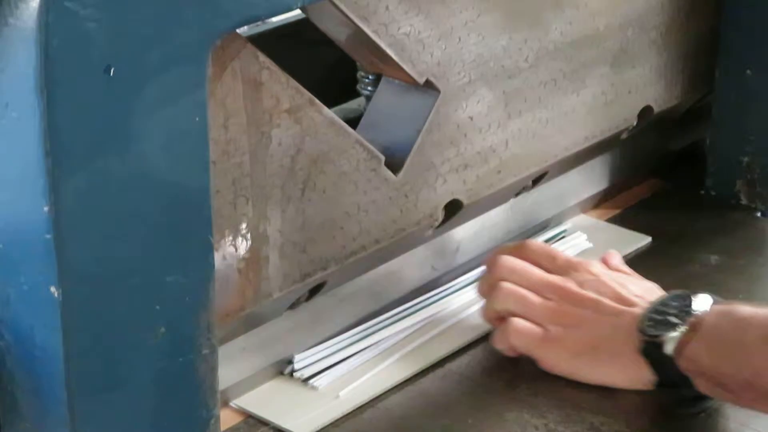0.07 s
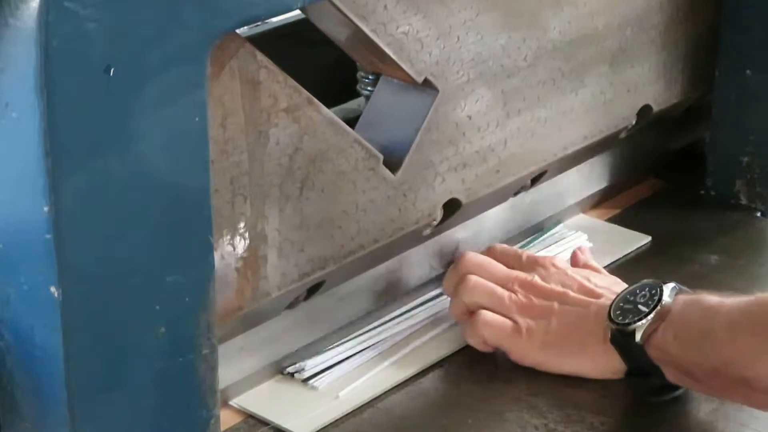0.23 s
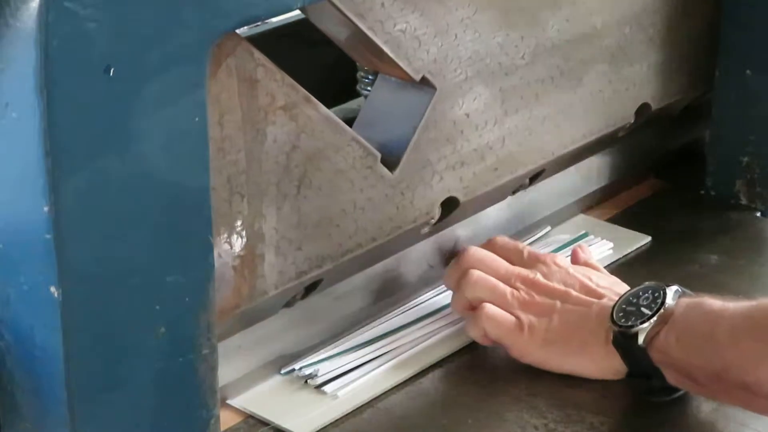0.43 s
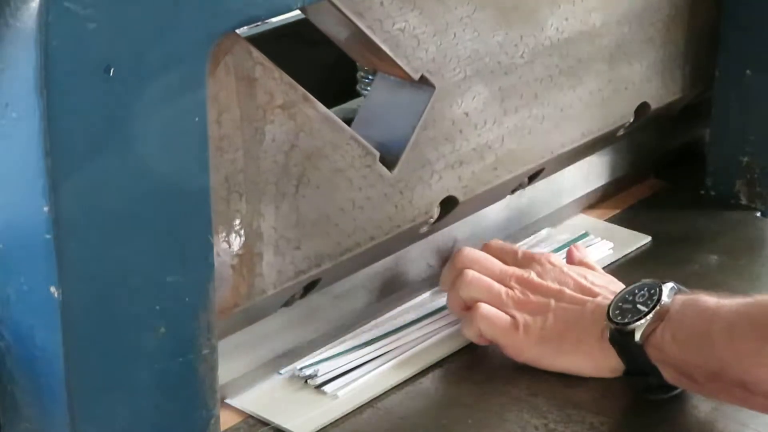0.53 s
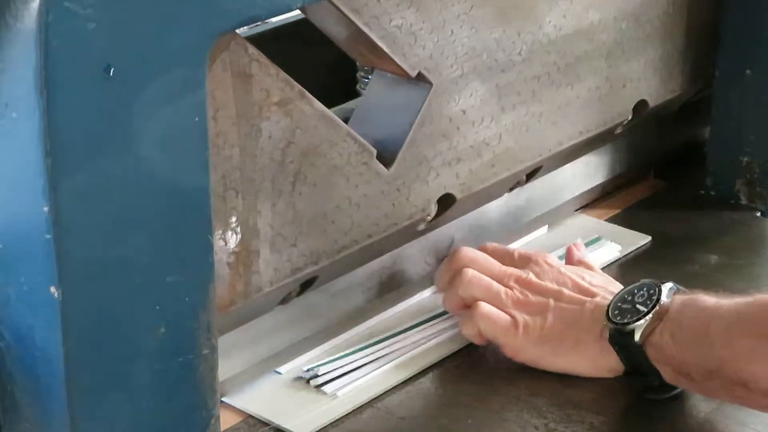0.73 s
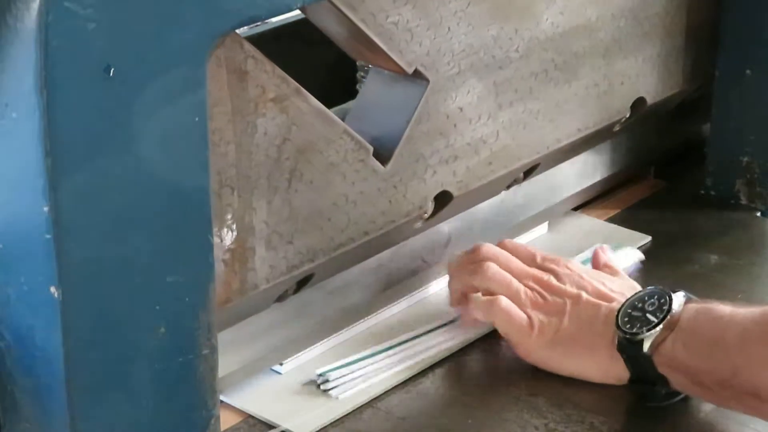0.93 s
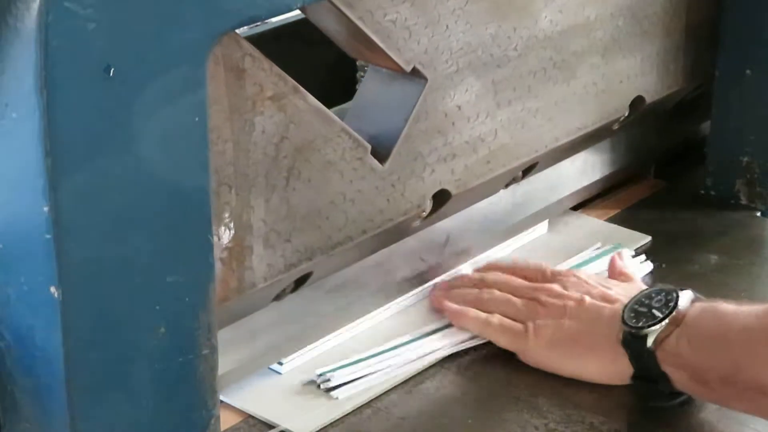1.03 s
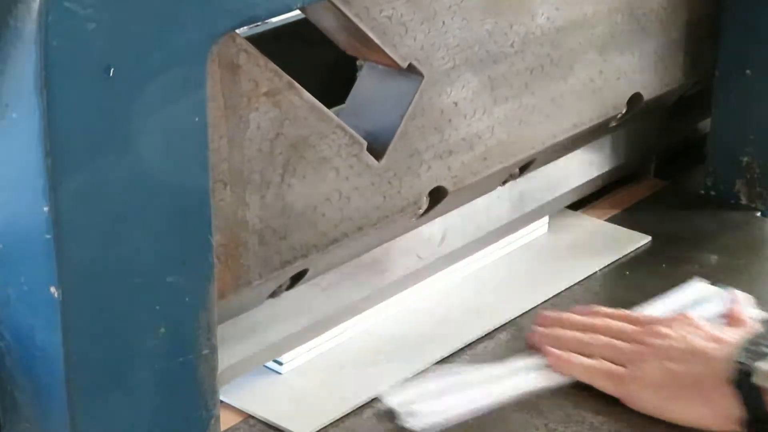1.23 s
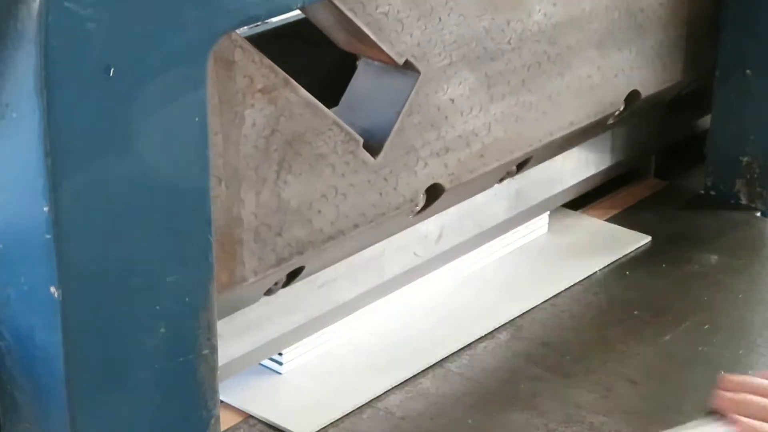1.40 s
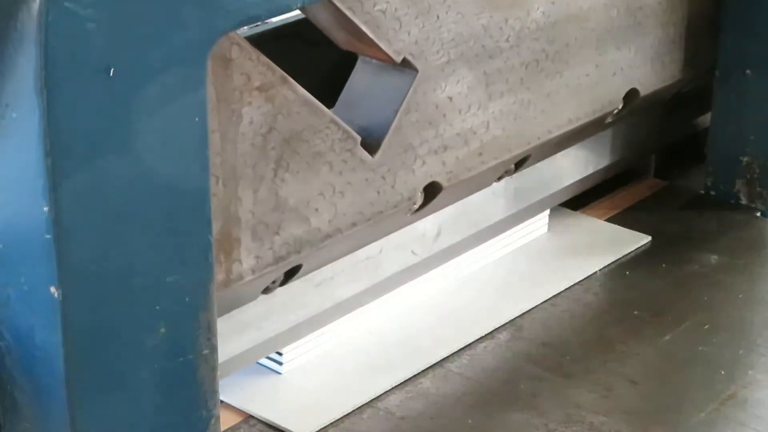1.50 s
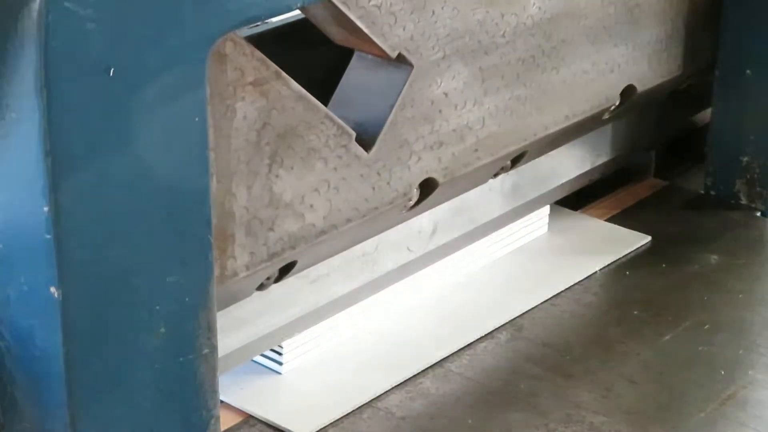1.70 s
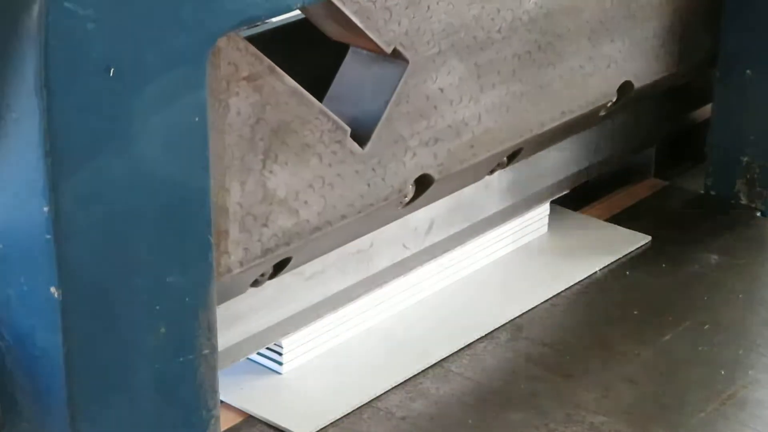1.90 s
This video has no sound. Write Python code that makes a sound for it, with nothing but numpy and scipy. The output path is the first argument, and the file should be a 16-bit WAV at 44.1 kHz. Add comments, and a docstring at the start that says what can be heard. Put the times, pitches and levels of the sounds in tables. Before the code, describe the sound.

One loud, ringing clunk comes from a paper guillotine close by, followed by irregular machinery knocks over a low workshop hum. A hand gathers paper strips with soft bumps and slides them off the steel table with a swish.

```python
"""A print workshop, where a paper guillotine idles. Its drive hums under dull knocks of machinery.
The steel mechanism lands with one rattling clunk: a quick series of impacts excites the damped modes
of the body and the longer ring of the frame. A hand gathers the cut strips, which tick and rustle,
and sweeps them off the steel table; friction makes the scrape and the swish."""
import sys
import numpy as np
from scipy.fft import rfft, irfft, next_fast_len
from scipy.io import wavfile
from scipy.ndimage import map_coordinates

SR = 44100
rng = np.random.default_rng(int(sys.argv[2]) if len(sys.argv) > 2 else 0)


def generate_wav(signal):
    """Clip the signal to [-1, 1] and save it as 16-bit WAV at the path in sys.argv[1]."""
    frames = np.transpose(np.atleast_2d(signal))
    scaled = np.clip(frames, -1, 1) * 32767
    pcm = np.round(scaled).astype(np.int16)
    wavfile.write(sys.argv[1], SR, pcm)


N = 85995
ENVELOPE_STEP = 8  # samples between envelope points

# left-right correlation of direct, nearby and diffuse sound (frequency [Hz], correlation [0-1])
DIRECT = [(100, .9999), (400, 1), (2200, 0.97), (4500, 0.81), (13000, 1)]
CLOSE = [(500, 0.78), (3000, 1), (5000, 0.91), (8500, 0.85), (13000, 0.25)]
DIFFUSE = [(60, 1), (130, 0.97), (350, 0.87), (800, 1), (1600, 0.85), (4000, 0.65), (13000, 0.23)]
# partials of the drive and spectrum of the workshop noise (frequency [Hz], level [dB])
HUM_PARTIALS = [(69, -46), (126, -57), (181, -55.5), (231.5, -48), (317, -55.5)]
SHOP_SPECTRUM = [(15, -35), (25, -10), (66, 7.5), (119, -6.5), (233, 0.5), (359, -6), (648, -2.5),
                 (826, -9.5), (945, -5), (1110, -10.5), (1490, -15.5), (3340, -25), (13200, -49),
                 (15500, -67)]
# swell of the hum (time [s], gain [dB])
HUM_SWELL = [(0, -25), (.14, -1.5), (.55, -0.5), (.9, 2), (1.15, 4.5), (1.33, -6), (1.5, 8), (1.75, -1),
             (1.95, 0)]
# knocks of machinery (time [s], mid level [dB], bass level [dB], top level [dB])
KNOCKS = [(.001, -61, -86, -31), (0.031, -37, -53, -35.5), (.075, -47, -57, -37), (.182, -20.5, -28.5, -30),
          (0.207, -27, -31.5, -30.5), (0.288, -49, -26, -34.5), (0.297, -29, -38, -45),
          (0.308, -35, -28, -57), (0.345, -33.5, -52, -39), (0.482, -34.5, -39, -69),
          (0.526, -37, -37, -53), (0.633, -29.5, -44, -53), (0.69, -31.5, -52, -39),
          (.715, -36.5, -55, -57), (0.752, -32, -58, -42), (0.859, -35, -34, -45),
          (0.919, -36.5, -32.5, -39.5), (0.972, -37, -30, -31.5), (1.004, -58, -49, -40),
          (1.028, -35, -29.5, -33), (1.058, -32.5, -52, -42), (1.084, -32, -48, -38.5),
          (1.138, -49, -60, -37.5), (1.423, -28, -31.5, -33), (1.48, -27, -30, -55),
          (1.501, -30.5, -28.5, -59), (1.547, -31.5, -35, -43), (1.606, -30, -29.5, -32.5),
          (1.626, -33, -24, -63), (1.667, -29, -28, -37.5), (1.726, -37.5, -29.5, -39.5),
          (1.787, -40, -31.5, -42), (1.846, -30.5, -38, -36.5), (1.93, -28.5, -30.5, -36.5)]
# spectra of those three bands (frequency [Hz], level [dB])
KNOCK_MID = [(250, -1.5), (480, -3.5), (700, 7.5), (950, 0.5), (1150, 0), (1500, 1), (1900, -14),
             (3500, -62)]
KNOCK_BASS = [(60, -65), (120, -3.5), (200, -6), (232, 8), (280, -12), (315, -1.5), (410, 0.5), (600, -27),
              (4000, -75)]
KNOCK_TOP = [(900, 5), (1750, 7), (2600, 2), (3200, -11.5), (3800, -11), (6000, -19.5), (15000, -59)]
# clanks of single steel parts (time [s], frequency [Hz], level [dB])
CLANKS = [(0.636, 934, -34), (0.633, 1490, -42), (.69, 1205, -42), (.972, 3200, -47), (1.085, 3260, -48),
          (1.328, 520, -34.5), (1.423, 1474, -38), (1.438, 681, -32), (1.605, 2684, -37),
          (1.606, 1420, -42), (1.668, 2500, -40.5)]
# bumps on the table, snaps of the strips, slaps of the bundle (time [s], level [dB], T60 [s])
BUMPS = [(.292, -24.5, .12), (.988, -32, 0.18), (1.05, -31, 0.11), (1.112, -32, 0.12),
         (1.168, -21.5, 0.054), (1.452, -39, 0.14)]
TICKS = [(.3792, -35.5, 0.016), (.5817, -51, 0.046), (1.123, -42, 0.039), (1.159, -42, 0.018),
         (1.939, -40, 0.046)]
SLAPS = [(1.3145, -24, 0.026), (1.328, -32.5, 0.089)]
# spectra of these impacts and of sliding paper (frequency [Hz], level [dB])
BUMP_SPECTRUM = [(40, -20), (80, -3), (135, 5), (190, -12), (300, -2), (1300, -79)]
TICK_SPECTRUM = [(800, -22), (3200, 8.5), (5000, 2.5), (9000, -3), (13000, -4), (15500, -9)]
SLAP_SPECTRUM = [(800, -22), (1600, 11.5), (2400, 6), (3600, -4), (4300, 2), (5200, 0), (8000, -17),
                 (15000, -33)]
SLIDE_SPECTRUM = [(400, -20), (1200, -1), (2100, 2.5), (3200, 0), (5000, -1), (8000, -3), (13300, -2.5),
                  (15500, -11)]
# paper sliding under the hand (time [s], level [dB])
SLIDE_LEVEL = [(0, -56.5), (.11, -63.5), (.27, -71), (.385, -69), (.405, -55), (.46, -60), (.5, -78),
               (.62, -81), (.66, -57.5), (.78, -70), (.9, -71), (.945, -50), (.968, -58), (1.01, -51),
               (1.05, -55.5), (1.1, -68), (1.16, -57.5), (1.22, -44), (1.33, -42), (1.5, -43),
               (1.56, -45.5), (1.64, -56), (1.72, -64), (1.84, -57.5), (1.875, -53.5), (1.92, -53),
               (1.95, -50)]
# scrape of the bundle's edge (time [s], centre frequency [Hz], level [dB])
SCRAPE = [(1.3, 1680, -50), (1.314, 1697, -35), (1.321, 2146, -43), (1.345, 1950, -44), (1.36, 2000, -47),
          (1.383, 2204, -46), (1.397, 1955, -44), (1.412, 1940, -54)]
# contacts within the clunk (time [s], crack level [dB], thud level [dB])
CONTACTS = [(0.1172, -23, -37), (0.1232, -24, -16.5), (0.1284, -24, -15), (0.1323, -15, -14.5),
            (0.14, -22, -35), (0.144, -23.5, -38), (0.149, -31, -40)]
# spectra of the crack, the thud and the frame's dense ring (frequency [Hz], level [dB])
CRACK_SPECTRUM = [(35, -39), (60, -15), (266, -10), (394, -2.5), (800, -0.5), (1100, -5.5), (1550, 2.5),
                  (1830, -10), (2100, -1), (2700, -8.5), (3340, -19.5), (4320, -18), (4960, -28),
                  (8280, -38), (15500, -52)]
THUD_SPECTRUM = [(40, -25), (130, 7), (280, -11), (400, 8), (900, -5), (2500, -71)]
FRAME_SPECTRUM = [(35, -38), (60, -20), (206, -16), (242, -6), (368, -15.5), (673, -9.5), (976, -8),
                  (2050, -9.5), (3500, -27.5), (4420, -25.5), (4960, -39.5), (12600, -54.5), (15500, -61)]
# modes of the thin loose parts, the heavy body and the steel (frequency [Hz], level [dB], T60 [s])
LOOSE_MODES = [(1440, -11, 0.46), (2130, -17, 0.52), (2534, -19, 0.21), (2800, -31, 0.13),
               (3054, -19, 0.39)]
BODY_MODES = [(130.2, -18.5, .08), (178.7, -10.5, 0.099), (398, 5, 0.033), (837, -1.5, 0.055)]
STEEL_MODES = [(243, -9, .8), (396, -5, .25), (573, -10, .3), (671, 0, .4), (721, -6, .45), (809, -1, .45),
               (904, -4, .5), (1035, -8, .55), (1292, -5, .4), (1535, 2, .35), (1683, 0, .4),
               (2067, 1.5, .52), (2774, -11, .45), (4270, -21, .6), (4404, -17, .55), (4735, -27, .6)]


def amp(db):
    """Amplitude grows tenfold for every 20 dB."""
    return 10 ** (np.asarray(db) / 20)


def unit(x):
    """Normalisation to an rms of 1."""
    return x / np.sqrt(np.mean(x ** 2) + 1e-20)


def along(points, hz):
    """Interpolation of (frequency [Hz], value) points on a logarithmic axis."""
    frequencies, values = np.transpose(points)
    return np.interp(np.log(hz + 1), np.log(frequencies + 1), values)


def since(onset_s):
    """Time elapsed since an onset, zero before it."""
    return np.maximum(np.arange(N) / SR - onset_s, 0)


def curve(rows):
    """Linear interpolation of (time [s], value) points at every sample."""
    return np.interp(since(0), *np.transpose(rows))


def wobble(rate):
    """Smooth random modulation: a spline through `rate` Gaussian values a second."""
    grid = np.arange(0, N, ENVELOPE_STEP) / SR
    spline = map_coordinates(rng.standard_normal(256), [grid * rate], mode="wrap")
    return np.interp(since(0), grid, spline)


def filtered(x, response):
    """Linear filtering multiplies the spectrum by a frequency response."""
    size = next_fast_len(N + SR // 4)
    return irfft(rfft(x, size) * response(np.fft.rfftfreq(size, 1 / SR)), size)[..., :N]


def coloured(spectrum, correlation=DIRECT, pair=None):
    """Shaped stereo noise of rms 1; the ratio of side to mid sets the left-right correlation."""
    def response(hz):
        angle = np.arccos(np.clip(along(correlation, hz), -1, 1)) / 2
        return amp(along(spectrum, hz)) * [np.cos(angle), np.sin(angle)]
    pair = rng.standard_normal((2, N)) if pair is None else pair
    mid, side = filtered(pair, response)
    return unit(np.array([mid + side, mid - side]))


def blows(rows, attack_s):
    """Envelope of decaying impacts (time [s], level [dB], T60 [s]); incoherent energies add."""
    onset, db, t60 = np.transpose(rows)[:, :, None]
    grid = np.arange(0, N, ENVELOPE_STEP) / SR
    age = np.maximum(grid - onset, 0)
    decay = np.exp(-np.minimum(np.log(1000) * age / t60, 20))
    rise = 1 - np.exp(-np.minimum(age / attack_s, 20))
    return np.interp(since(0), grid, np.linalg.norm(amp(db) * decay * rise, axis=0))


def partial(hz, stray_rad, rate):
    """Random phase modulation broadens the spectral line of a sinusoid."""
    return np.sin(2 * np.pi * (hz * since(0) + rng.random()) + stray_rad * wobble(rate))


def ringing(modes, hits, stray_rad, waver_db=0, attack_s=0.00018):
    """Superposition of damped, slightly wavering modes excited by hits (time [s], level [dB])."""
    out = 0
    for hz, level, t60 in modes:
        envelope = blows([(s, db + level, t60) for s, db in hits], attack_s)
        out = out + envelope * amp(waver_db * wobble(rate=65)) * partial(hz, stray_rad, rate=65)
    return out


def workshop():
    """Diffuse background noise: its left-right correlation is lowest at short wavelengths."""
    level_db = -40 + 1.95 * wobble(rate=35.18)
    return coloured(SHOP_SPECTRUM, DIFFUSE) * amp(level_db)


def drive():
    """The drive hums in a line spectrum, each partial modulated in amplitude and phase."""
    hum = 0
    for hz, db in HUM_PARTIALS:
        rms = amp(db + 1.8 * wobble(rate=9.29))
        hum = hum + rms * np.sqrt(2) * partial(hz, stray_rad=0.65, rate=7.84)
    return hum * amp(curve(HUM_SWELL))


def knocks():
    """Impacts of loose machinery: direct and reverberant energies add, and thin parts ring."""
    direct_t60, room_t60, room_db = 0.097, 0.48, -9
    out = 0
    for band, spectrum in enumerate([KNOCK_MID, KNOCK_BASS, KNOCK_TOP]):
        direct = blows([(s, levels[band], direct_t60) for s, *levels in KNOCKS], attack_s=0.0024)
        room = blows([(s, levels[band] + room_db, room_t60) for s, *levels in KNOCKS], attack_s=0.0081)
        out = out + coloured(spectrum) * np.hypot(direct, room)
    return out + ringing(LOOSE_MODES, [(s, top) for s, _, _, top in KNOCKS], stray_rad=1.0)


def clanks():
    """Free vibration: each struck steel part rings briefly at its natural frequency."""
    t60 = 0.12
    return sum(ringing([(hz, 0, t60)], [(s, db)], stray_rad=0.91, waver_db=2) for s, hz, db in CLANKS)


def table_bumps():
    """Soft impacts on the table build up slowly and excite mainly low frequencies."""
    return coloured(BUMP_SPECTRUM) * blows(BUMPS, attack_s=0.0061)


def paper():
    """Friction of catching fibres makes the strips hiss; impacts make them tick and slap the table."""
    catches_per_s, catch_share = 1600, 0.21
    catches = unit(rng.standard_normal((2, N)) * (rng.random(N) < catches_per_s / SR))
    friction = np.sqrt(catch_share) * catches + np.sqrt(1 - catch_share) * rng.standard_normal((2, N))
    swish = coloured(SLIDE_SPECTRUM, CLOSE, friction) * amp(curve(SLIDE_LEVEL) + 0.5 * wobble(rate=60.8))
    ticks = coloured(TICK_SPECTRUM) * blows(TICKS, attack_s=0.0005)
    slaps = coloured(SLAP_SPECTRUM, CLOSE) * blows(SLAPS, attack_s=0.0009)
    return swish + ticks + slaps


def steel_reflections(x, count):
    """Comb filtering: weak reflections from nearby steel faces interfere with the direct sound."""
    gain, delay_range_s = amp(-12.5), (0.0008, 0.006)
    lags = (rng.uniform(*delay_range_s, count) * SR).astype(int)
    echoes = sum(np.pad(x, ((0, 0), (lag, 0)))[:, :N] for lag in lags)
    return (x + gain * echoes) / np.sqrt(1 + count * gain ** 2)


def scrape():
    """Friction of the bundle's edge on the table gives narrow-band noise with a gliding centre."""
    width_hz = 520
    centre_hz = curve([(s, hz) for s, hz, _ in SCRAPE])
    level_db = curve([(s, db) for s, _, db in SCRAPE])
    phase = 2 * np.pi * np.cumsum(centre_hz) / SR
    band = unit(wobble(width_hz) * np.cos(phase) + wobble(width_hz) * np.sin(phase))
    sliding = (since(SCRAPE[0][0]) > 0) & (since(SCRAPE[-1][0]) == 0)
    return sliding * amp(level_db) * band


def clunk():
    """Impact excitation: steel lands in a rattle of contacts that thud in the body and ring the frame."""
    crack_t60, thud_t60, ring_t60 = 0.11, 0.071, 0.79
    thud_db, ring_db, clang_db = -6, -13.3, -12.7
    cracks = [(s, db) for s, db, _ in CONTACTS]
    thuds = [(s, db) for s, _, db in CONTACTS]
    crack = coloured(CRACK_SPECTRUM) * blows([(s, db, crack_t60) for s, db in cracks], 0.0008)
    thud = coloured(THUD_SPECTRUM) * blows([(s, db + thud_db, thud_t60) for s, db in thuds], 0.0011)
    body = ringing(BODY_MODES, thuds, stray_rad=0.16, attack_s=0.0017)
    ring = coloured(FRAME_SPECTRUM) * blows([(s, db + ring_db, ring_t60) for s, db in cracks], 0.0021)
    clang = ringing(STEEL_MODES, [(s, db + clang_db) for s, db in cracks], stray_rad=0.42, waver_db=2)
    return crack + thud + body + ring + clang


def scene():
    """Superposition: the sound pressures of machine, workshop and paper add."""
    machinery = clunk() + knocks() + clanks() + drive() + workshop()
    return machinery + table_bumps() + steel_reflections(paper(), count=8) + scrape()


def record(dry):
    """Band limiting: an ideal low-pass filter removes the highest treble."""
    return filtered(dry, lambda hz: hz < 15750)


dry = scene()
out = record(dry)
generate_wav(out)
```